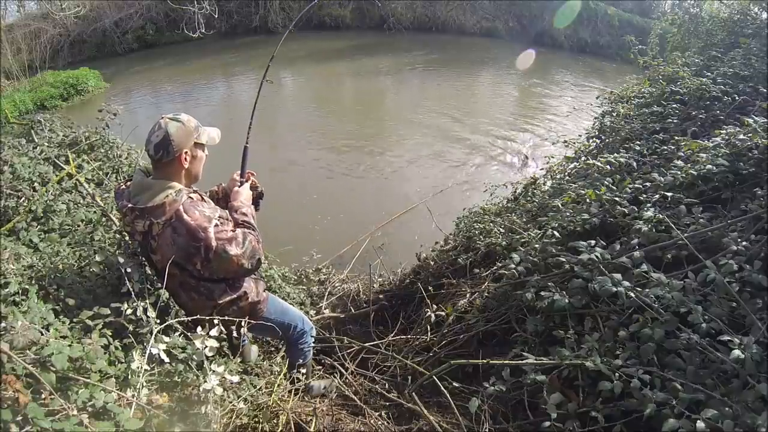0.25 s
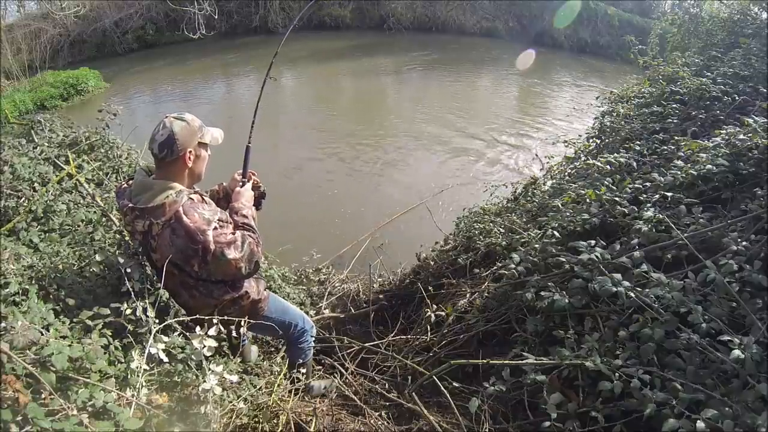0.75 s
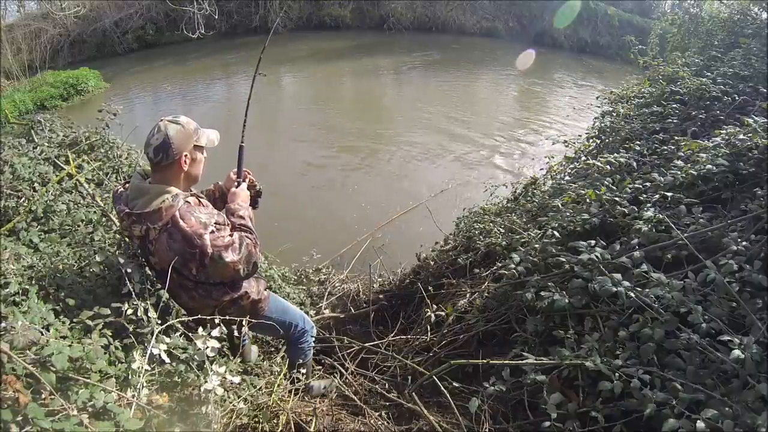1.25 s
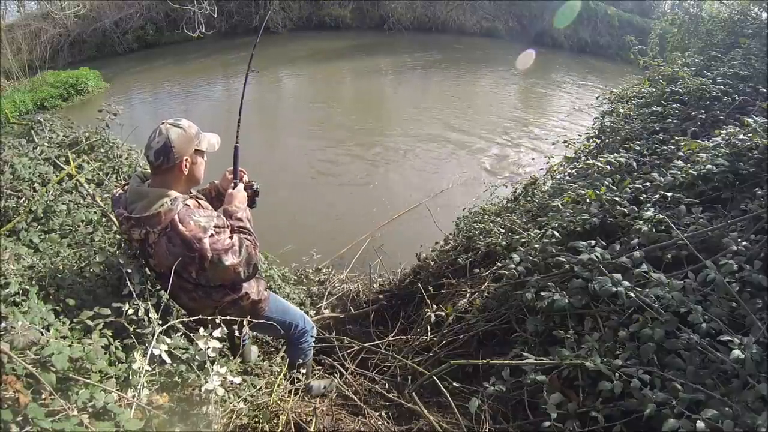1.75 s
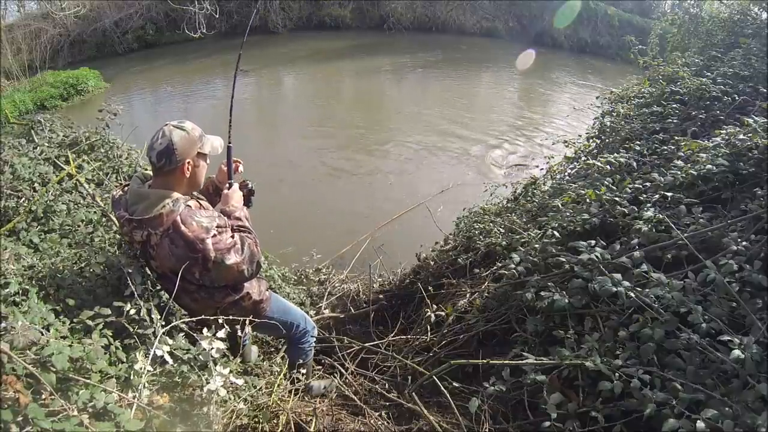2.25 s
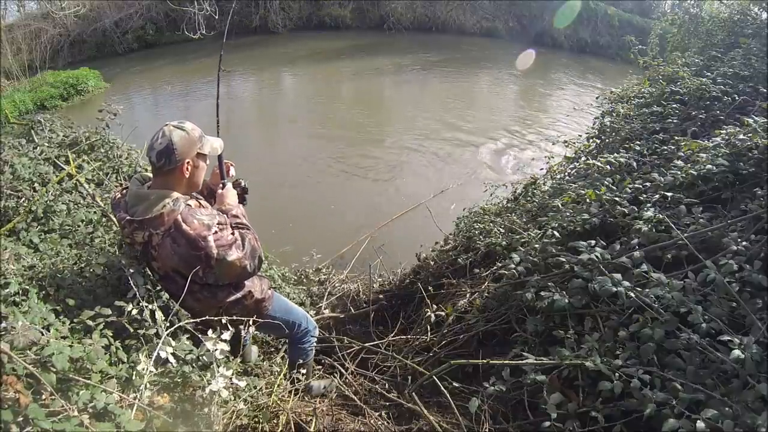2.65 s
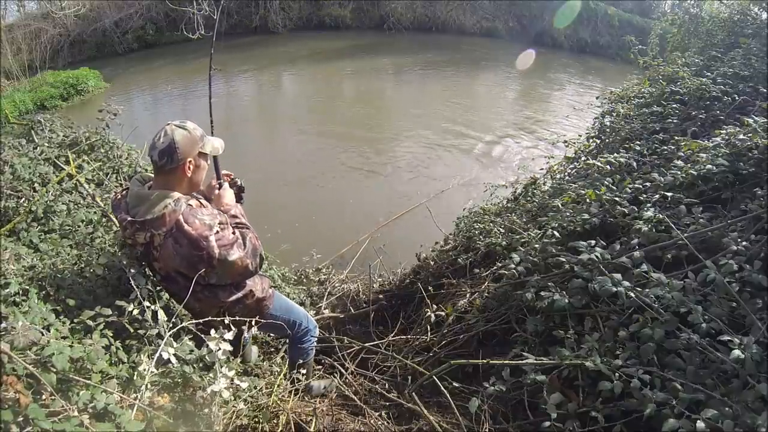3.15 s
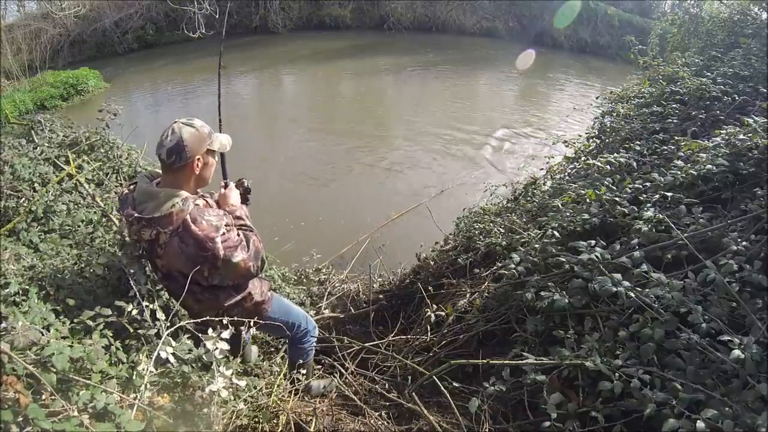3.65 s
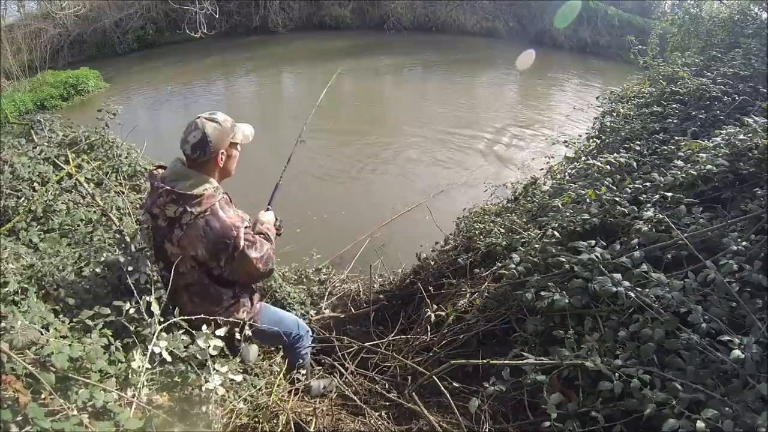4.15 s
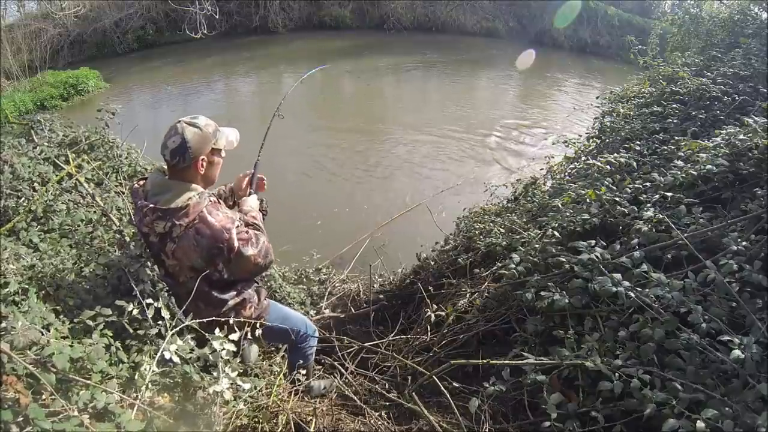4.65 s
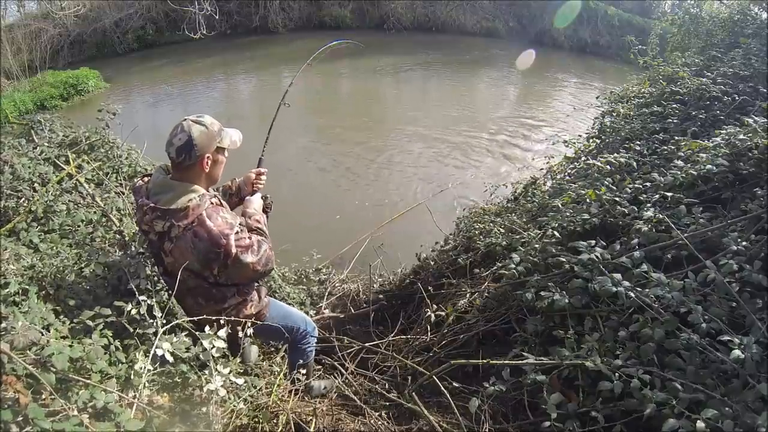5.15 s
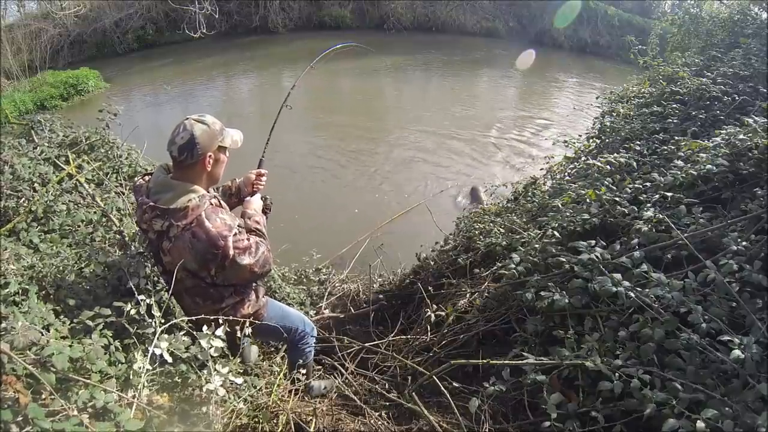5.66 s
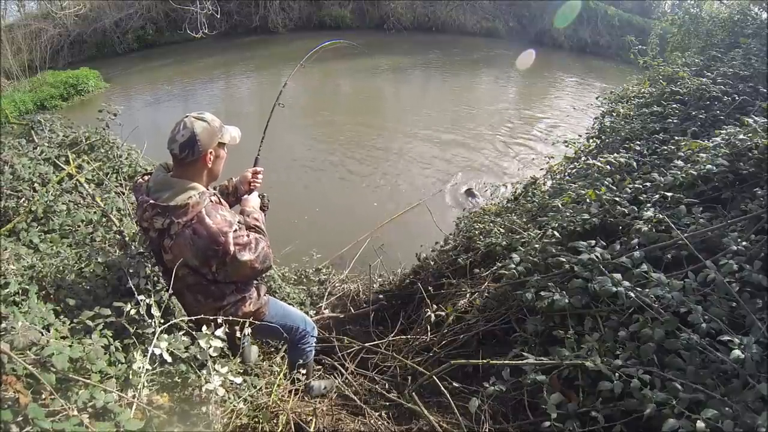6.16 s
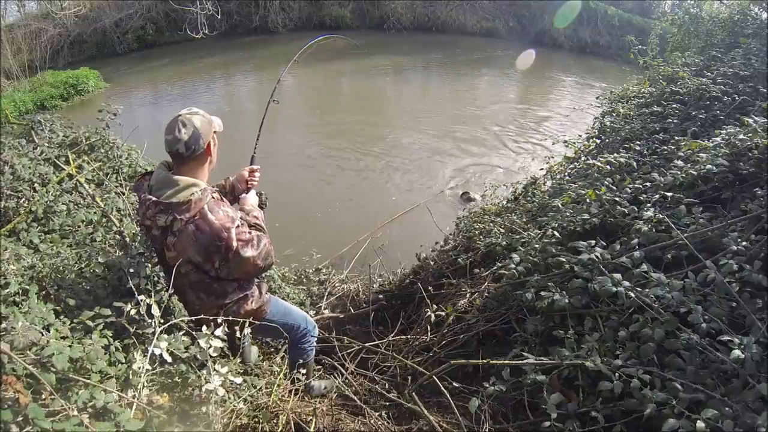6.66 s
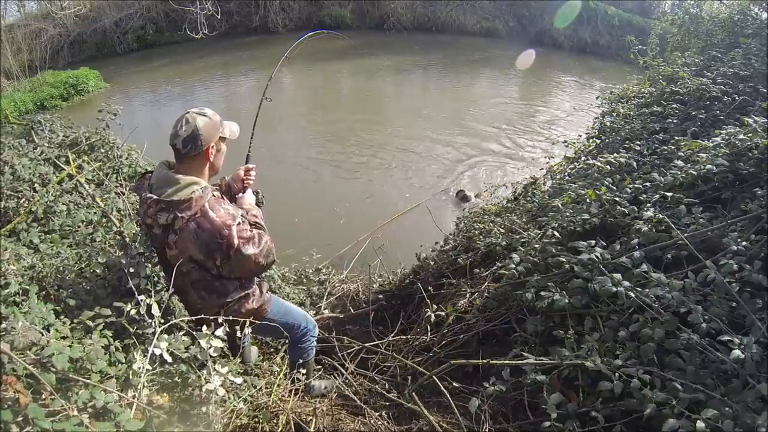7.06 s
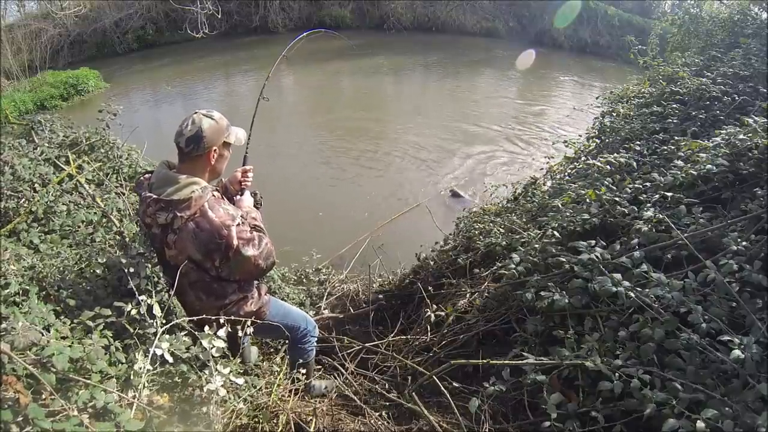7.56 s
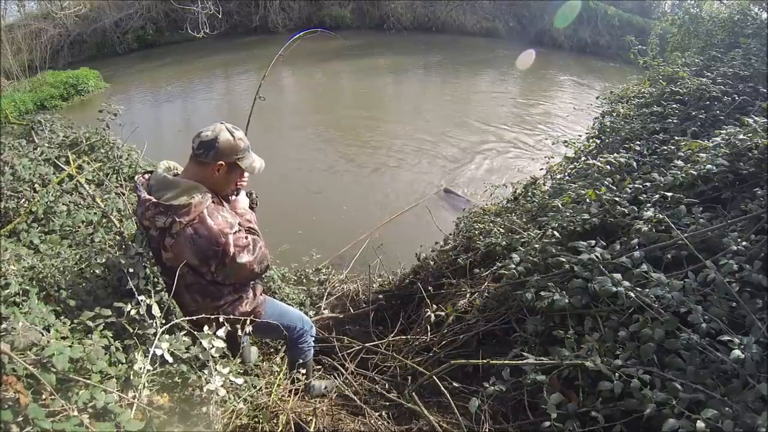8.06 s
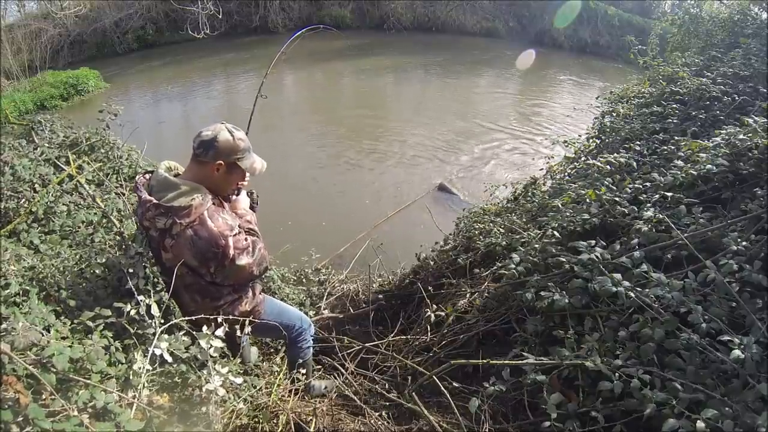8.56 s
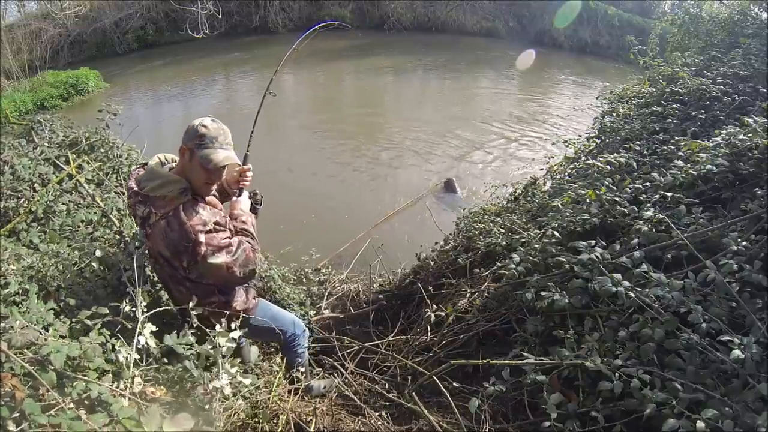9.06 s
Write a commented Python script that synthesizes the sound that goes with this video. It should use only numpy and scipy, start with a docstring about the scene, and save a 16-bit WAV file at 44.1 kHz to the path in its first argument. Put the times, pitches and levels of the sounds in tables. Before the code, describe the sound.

A hooked fish swirls, gulps and thuds at a muddy riverbank over distant engine rumble; a reel clicks once, dry stalks crack at the end.

```python
"""A hooked fish swirls, gulps and thuds at the surface; dry stalks crack, a reel clicks, an engine pulls away.
A small bird warbles faintly over distant traffic, a high hiss and a thin steady tone.
Engine, bird and thin tone are driven sines; bubbles, ticks, stems and reel are decaying tones; cracks are
short tone pulses. Traffic, hiss, fizz, spray and leaves are coloured noise or grains under level curves."""
import sys
import numpy as np
from scipy import signal
from scipy.fft import rfft, irfft, next_fast_len
from scipy.io import wavfile

SR = 44100
rng = np.random.default_rng(int(sys.argv[2]) if len(sys.argv) > 2 else 0)


def volts(x):
    """Linear amplitude factor 10**(x/20) for a level x in dB, scalar or array-like."""
    e = np.asarray(x, float) / 20
    return 10 ** e


def transcribe(u):
    """Save the signal u as a 16-bit wav file named by the first command-line argument.

    u: samples, shape (n,) or (channels, n), limited to [-1, 1]; the rate is SR.
    q: integer samples, one column per channel.
    """
    v = np.clip(np.atleast_2d(u).T, -1, 1)
    q = np.round(v * 32767).astype(np.int16)
    wavfile.write(sys.argv[1], SR, q)


N = 411012

# spectrum of churned water: f/Hz, relative density/dB
CHURN_TONE = [(180, -25), (300, 1), (380, -13), (451, -7), (595, -5.5), (653, -3.5), (1090, 4), (1420, -7),
              (1980, 0.5), (2860, -16), (7000, -32), (9100, -69), (15400, -120)]
# spectrum of fine spray: f/Hz, relative density/dB
SPRAY_TONE = [(1800, -30), (2500, -3), (3200, 0), (3900, -9), (5200, -12), (6200, -24), (9000, -26),
              (15000, -36)]
# spectrum of dry leaves: f/Hz, relative density/dB
RUSTLE_TONE = [(180, -39), (300, -10), (492, -10), (662, -8.5), (1240, -4), (1370, -12), (1930, -2.5),
               (2560, -12), (5120, -22), (5550, -24.5), (7230, -35.5), (8810, -26), (15400, -41)]
# large bubbles: t/s, start level/dB, start f/Hz, rise/(octaves/s)
BUBBLES = [(.755, -49, 1120, -1), (1.129, -50, 740, -4), (1.955, -55, 1250, 8), (2.028, -46, 908, -12),
           (2.072, -38.5, 813, 0.5), (2.073, -49, 1065, 9), (2.085, -53, 495, 3), (2.158, -51, 1700, 5),
           (2.19, -54, 1110, -6), (2.812, -48, 870, -1.5), (3.635, -48, 1000, 9), (3.657, -49, 950, 3),
           (4.305, -45, 2120, -5), (4.327, -44.5, 1210, 1), (4.38, -48, 2100, -1), (4.4, -43, 2000, 3),
           (5.418, -48, 860, -3), (5.471, -46, 1030, -1), (5.495, -45, 1026, 0), (5.577, -45, 848, 8.5),
           (5.705, -44.5, 670, 5), (5.88, -52, 1160, 2), (5.93, -46, 960, -1), (5.965, -42, 1113, 0.5),
           (6.07, -46.5, 767, 0), (6.815, -49, 518, -1), (6.864, -46, 1400, -9), (6.869, -44, 998, 1),
           (6.928, -49.5, 386, -4.5), (6.932, -48, 1050, 5), (7.01, -45, 974, 2), (7.232, -49, 760, 9),
           (7.727, -46, 1000, -1.5), (8.123, -45.5, 1160, 1)]


def rms_one(x):
    """Scale to rms 1."""
    return x / np.sqrt(np.mean(x ** 2) + 1e-20)


def in_time(rows):
    """Columns of a table as sample curves."""
    s, *columns = np.transpose(rows)
    return [np.interp(np.arange(N) / SR, s, c) for c in columns]


def fade(rows, edge_s):
    """1 inside the table's span, sloping to 0 outside."""
    first_s, last_s = rows[0][0], rows[-1][0]
    return np.interp(np.arange(N) / SR, [first_s - edge_s, first_s, last_s, last_s + edge_s], [0, 1, 1, 0])


def coloured(x, spectrum):
    """Shape a white signal to this spectrum, log-f interpolated; rms 1."""
    hz, db = np.transpose(spectrum)
    size = next_fast_len(N)
    log_hz = np.log(np.arange(1, size // 2 + 2) * SR / size)
    gain = volts(np.interp(log_hz, np.log(hz), db))
    return rms_one(irfft(rfft(x, size) * gain, size)[:N])


def drift(rate_hz):
    """Slow random wander of rms 1: twice low-passed noise, drawn every 40 samples."""
    r = np.exp(-80 * np.pi * rate_hz / SR)
    slow = signal.lfilter([1], [1, -2 * r, r * r], rng.standard_normal(N // 40 + 2002))[2000:]
    return np.interp(np.arange(N) / 40, np.arange(len(slow)), rms_one(slow))


def ring(clicks, hz, t60_s):
    """Two-pole resonance: a unit click starts a dying sine of height 1."""
    r, w = volts(-60 / (t60_s * SR)), 2 * np.pi * hz / SR
    return signal.lfilter([0, np.sin(w)], [1, -2 * r * np.cos(w), r * r], clicks + 1e-18)


def add(out, s, db, hz, t60_s, rise, attack_s):
    """Add one dying tone gliding by rise octaves/s."""
    start = round(s * SR)
    t = np.arange(min(round(1.2 * t60_s * SR), N - start)) / SR
    turns = np.cumsum(hz * 2 ** (rise * t)) / SR
    level = volts(db - 60 * t / t60_s) * np.minimum(t / attack_s, 1)
    out[start:start + len(t)] += level * np.sin(2 * np.pi * turns)


def bursts(times, db, t60_s):
    """Envelope that jumps at each time and dies away."""
    marks = np.zeros(N)
    marks[np.round(np.array(times) * SR).astype(int)] = volts(db)
    return signal.lfilter([1], [1, -volts(-60 / (t60_s * SR))], marks + 1e-18)


def grains(per_s, spread_db):
    """Random clicks of uneven size and either sign."""
    sizes = volts(spread_db * np.minimum(rng.exponential(1, N), 4)) * rng.choice([-1, 1], N)
    return sizes * (rng.random(N) < per_s / SR)


def hiss():
    """High noise with a quick level flutter."""
    # f/Hz, relative density/dB
    air_tone = [(1900, -37), (2500, -1.5), (3150, -1), (3450, -8.5), (4300, -13), (5300, -14), (6300, -19),
                (7600, -21), (8700, -17), (10300, -24.5), (11300, -21), (12300, -28.5), (14000, -23.5),
                (15200, -29)]
    return volts(-71.5 + 1.96 * drift(37)) * coloured(rng.standard_normal(N), air_tone)


def whine():
    """Thin high sine with slight phase wander."""
    level_db, hz = -99, 11300
    return volts(level_db) * np.sin(2 * np.pi * hz * np.arange(N) / SR + 0.72 * drift(8))


def traffic():
    """Rumble, tyre noise and exhaust drone: coloured noises, each gently lumpy."""
    # rumble swelling and fading: t/s, level/dB before wander
    roar = [(0, -57), (1.06, -58.5), (2.28, -57), (3.71, -56.5), (4.38, -52.5), (5.4, -52), (6.1, -50.5),
            (6.4, -54), (6.9, -55), (7.47, -54), (8.33, -54.5), (8.82, -55), (9.32, -59)]
    # spectra: f/Hz, relative density/dB
    rumble_tone = [(12, -40), (20, -3.5), (48, 5.5), (75, 1), (99, -2), (178, -19), (300, -25.5),
                   (390, -45), (660, -120)]
    road_tone = [(88, -44), (150, 0), (246, -6.5), (342, -3), (380, -5.5), (595, -3), (638, -3.5),
                 (677, -4.5), (963, 0), (1470, -8), (1880, -1.5), (2500, -15.5), (3250, -49), (5500, -120)]
    drone_tone = [(90, -33), (135, 4), (240, -1.5), (330, -5.5), (480, -29), (900, -100)]
    # exhaust drone: t/s, level/dB before wander
    drone_level = [(1, -75), (6, -61), (6.7, -80), (9.32, -87)]
    road_db, road_follows = -59.5, 0.6   # at mean rumble dB; share of its swell
    rumble_db, = in_time(roar)
    road_db = road_db + road_follows * (rumble_db - rumble_db.mean())
    drone_db, = in_time(drone_level)
    rumble = volts(rumble_db + 1.5 * drift(1.5)) * coloured(rng.standard_normal(N), rumble_tone)
    road = volts(road_db + 0.7 * drift(7.8)) * coloured(rng.standard_normal(N), road_tone)
    drone = volts(drone_db + 1.1 * drift(5.0)) * coloured(rng.standard_normal(N), drone_tone)
    return rumble + road + drone


def engine():
    """Four firing orders as sines, weighted by pipe and distance; the air makes them waver."""
    # speed, idling then pulling away: t/s, firing f/Hz before wander
    firing = [(0, 31), (1.9, 32), (2.8, 37), (4, 44), (5.2, 50), (6, 52.8), (7.06, 62.3), (8.2, 71.5),
              (9.32, 78)]
    # t/s, effort/dB
    effort = [(0, -67), (.8, -57), (1.1, -57), (1.9, -53.5), (2.3, -47), (3.2, -49), (3.9, -55.5),
              (4.3, -48), (4.7, -52.5), (5.1, -55), (5.5, -57.5), (6, -52), (7.1, -45), (7.5, -52),
              (9.32, -56)]
    # pipe and distance weighting of an order: f/Hz, gain/dB
    exhaust = [(55, -0.3), (63, -6.5), (75, -2.5), (88, -10), (98, 0), (107, -11), (116, -19), (130, -12.5),
               (145, -18.5), (200, -40)]
    order_loss_db = 1.4   # per order
    hz = in_time(firing)[0] * (1 + 0.0058 * drift(1.96))
    turns, effort_db = np.cumsum(hz) / SR, in_time(effort)[0]
    pipe_hz, pipe_db = np.transpose(exhaust)
    out = np.zeros(N)
    for k in range(1, 5):
        weight_db = np.interp(np.log(k * hz), np.log(pipe_hz), pipe_db) - order_loss_db * (k - 0.5)
        level = np.sqrt(2) * volts(effort_db + weight_db + 1.54 * drift(4.2))
        out += level * np.sin(2 * np.pi * k * turns)
    return out


def bird():
    """A far warble of gliding sines, broken and blurred by leaves."""
    # one list per note: t/s, f/Hz before wander, level/dB before blur
    notes = [
        [(2.34, 2700, -68), (2.36, 2460, -66), (2.4, 2430, -67), (2.42, 2520, -65), (2.46, 2550, -67)],
        [(3.575, 2710, -66), (3.6, 2500, -63), (3.64, 2350, -67)],
        [(3.865, 1800, -62), (3.89, 2320, -61), (3.905, 2360, -50), (3.925, 2370, -63), (3.95, 2950, -68)],
        [(4.06, 3000, -70), (4.115, 3250, -68), (4.15, 2300, -63)],
        [(4.25, 3120, -69), (4.285, 3040, -67)],
        [(4.335, 2200, -65), (4.365, 2380, -62)],
        [(8.05, 2600, -66), (8.1, 2400, -67)],
    ]
    out = np.zeros(N)
    blur = 0.8 + 0.45 * drift(120)
    for rows in notes:
        hz, db = in_time(rows)
        turns = np.cumsum(hz * (1 + 0.01025 * drift(41.6))) / SR
        out += volts(db + 2.0 * drift(25)) * blur * fade(rows, 0.015) * np.sin(2 * np.pi * turns)
    return out


def cracks():
    """A stalk's crack is a cycle or so of its body tone under a Gaussian."""
    # t/s, peak/dB, body f/Hz
    crack_rows = [(8.8294, -46, 2720), (8.979, -31.5, 1120), (9.053, -40, 1700), (9.061, -36, 1950),
                  (9.105, -46, 1500), (9.1197, -30.5, 670), (9.1639, -35, 2000), (9.1766, -32, 900),
                  (9.209, -32, 610), (9.2134, -36, 700), (9.2153, -33, 1500), (9.2254, -35, 620),
                  (9.234, -25.5, 970), (9.24, -40, 1600), (9.2568, -30, 1170), (9.2626, -24.5, 840),
                  (9.266, -25.5, 1950), (9.277, -34, 1930), (9.3009, -24, 865)]
    out, t = np.zeros(N), np.arange(-200, 200) / SR
    width_cycles = 0.98   # full width at 1/e
    for s, db, hz in crack_rows:
        at = round(s * SR)
        pulse = np.exp(-(2 * t * hz / width_cycles) ** 2) * np.cos(2 * np.pi * hz * t)
        out[at - 200:at + 200] += volts(db) * pulse
    return out


def stems():
    """Knocked hollow stems ring on a little, falling in pitch."""
    # t/s, start level/dB, start f/Hz, t60/s
    knocks = [(8.944, -26.5, 850, 0.022), (9.173, -25, 480, 0.027), (9.261, -29, 597, 0.035),
              (9.272, -30, 1950, .028)]
    out = np.zeros(N)
    for s, db, hz, t60_s in knocks:
        add(out, s, db, hz, t60_s, rise=-7.0, attack_s=0.003)
    return out


def leaves():
    """Dry leaves brush and puff as grains; each puff opens with a noise snap."""
    # brushing: t/s, level/dB before wander
    rustle = [(8.8, -72), (8.96, -62), (9.1, -59), (9.14, -68), (9.2, -58), (9.25, -58), (9.275, -51),
              (9.32, -55)]
    # puffs: t/s, start level/dB
    puffs = [(8.829, -60), (8.871, -60), (8.898, -60), (8.978, -50), (9.06, -50), (9.105, -58),
             (9.162, -52), (9.176, -47), (9.214, -48), (9.234, -49), (9.257, -53), (9.264, -40), (9.3, -49)]
    s, db = np.transpose(puffs)
    texture = coloured(grains(6000, spread_db=3.5), RUSTLE_TONE)
    brushing = volts(in_time(rustle)[0] + 2.5 * drift(30)) * fade(rustle, 0.12)
    snaps = coloured(rng.standard_normal(N), RUSTLE_TONE) * bursts(s, db + 6.0, t60_s=0.009)
    return snaps + texture * (brushing + bursts(s, db, t60_s=0.05))


def reel():
    """Quick contacts strike the reel's modes; the bushes scatter a short tail back."""
    # contacts: t/s, strike/dB
    contacts = [(1.544, -45), (1.5642, -22), (1.5655, -13.5), (1.5681, -24), (1.5694, -24), (1.5733, -35)]
    # modes: f/Hz, gain/dB, t60/s
    modes = [(974, -16, 0.011), (1650, -17, 0.016), (1950, -10, 0.011), (2335, -7.5, 0.011),
             (3110, -7.5, 0.013), (3670, -15, 0.01), (4240, -14, 0.0079), (4750, -21, 0.009),
             (5500, -23, 0.009), (6500, -27, .004), (8300, -25, 0.004), (10200, -26, 0.003),
             (12500, -27, .003)]
    # scattered tail: f/Hz, relative density/dB
    echo_tone = [(710, -60), (1200, -25), (2190, 1), (2600, -16), (2790, -5), (3490, -15), (5500, -16),
                 (6170, -31), (9320, -21), (15000, -33)]
    s, db = np.transpose(contacts)
    out = np.zeros(N)
    for k, (hz, mode_db, t60_s) in enumerate(modes):
        clicks = np.zeros(N)
        clicks[np.round(s * SR).astype(int)] = volts(db + mode_db + rng.normal(0, 1.5, len(s)))
        out += (-1) ** k * ring(clicks, hz, t60_s)
    # a small part radiates no bass
    out = signal.sosfilt(signal.butter(2, 600, "high", fs=SR, output="sos"), out)
    scatter = coloured(rng.standard_normal(N), echo_tone) * volts(3.0 * drift(70))
    return out + scatter * bursts([s[2] + 0.0028], -42.5, t60_s=0.17)


def ticks():
    """Drops and ticks ring briefly, each inside a short puff of spray."""
    # t/s, start level/dB, start f/Hz
    tick_rows = [(0.4095, -44, 2090), (0.432, -45, 1800), (0.7196, -41.5, 1970), (1.0972, -46.5, 1900),
                 (2.0273, -37, 1840), (2.035, -39, 1820), (2.1186, -41, 2010), (2.149, -49, 2950),
                 (2.7054, -34.5, 1840), (2.706, -41, 1240), (3.5468, -41.5, 1900), (3.68, -45, 1930),
                 (3.9779, -30, 2070), (4.289, -45, 3070), (4.4877, -41, 1890), (4.632, -45, 1900),
                 (5.393, -48, 2150), (5.474, -44, 2400), (5.4954, -40, 2450), (5.7226, -35, 2000),
                 (5.73, -37, 1980), (5.75, -39, 1850), (6.05, -40, 1950), (6.075, -40, 1900),
                 (6.095, -44, 1950), (6.18, -44, 2200), (6.3964, -43.5, 2150), (6.61, -53, 2500),
                 (6.8658, -45, 1910), (6.9306, -41.5, 1840), (7.2325, -41, 1900)]
    out = np.zeros(N)
    for s, db, hz in tick_rows:
        add(out, s, db, hz, t60_s=0.017, rise=0.1, attack_s=0.00096)
    s, db, hz = np.transpose(tick_rows)
    return out + coloured(rng.standard_normal(N), CHURN_TONE) * bursts(s, db - 18.5, t60_s=0.045)


def plips(strength):
    """Small drops fall at random, thicker and louder with the churn, gliding up."""
    count, mean_db, follows = 200, -55.5, 0.6   # base level at mean churn; share of its dB swing
    t60_cycles = 34
    out = np.zeros(N)
    share = np.cumsum(strength) / np.sum(strength)
    for when, size, pitch, rise in rng.random((count, 4)):
        at = min(np.searchsorted(share, when), N - 1)
        hz = 700 * 3.6 ** pitch
        swing_db = 20 * np.log10(strength[at] / strength.mean())
        db = mean_db + follows * swing_db - 4.0 * np.log(size + 0.05)
        add(out, at / SR, db, hz, t60_cycles / hz, 25 * rise, attack_s=0.0015)
    return out


def droplets():
    """Fine spray droplets are tiny high pings, gliding up."""
    # t/s, start level/dB, start f/Hz
    droplet_rows = [(1.9814, -59, 4850), (2.0009, -64, 5240), (2.0358, -59, 4210), (2.0654, -67, 4690),
                    (2.0712, -62, 4220), (2.0994, -66, 5200), (2.1181, -59, 4290), (2.1424, -64, 5310),
                    (2.1924, -63, 4990), (2.2114, -68, 5280)]
    out = np.zeros(N)
    for s, db, hz in droplet_rows:
        add(out, s, db, hz, t60_s=0.0094, rise=5.0, attack_s=0.001)
    return out


def flicks():
    """Flicks of bright spray: noise bursts dying fast."""
    # t/s, start level/dB
    flick_rows = [(1.458, -66), (2.035, -65), (2.07, -65), (2.118, -66), (4.047, -68), (4.07, -68),
                  (4.45, -65), (5.875, -65), (6.742, -57), (6.837, -65), (6.88, -63), (7.28, -61),
                  (7.35, -63)]
    s, db = np.transpose(flick_rows)
    return bursts(s, db, t60_s=0.035) * coloured(rng.standard_normal(N), SPRAY_TONE)


def churning():
    """Gains of churn and spray: swirls rise, hold lumpily and fall; large bubbles add fizz to the churn."""
    # fish swirls: t/s, length/s, churn/dB, spray/dB, both before lumpiness
    swirl_rows = [(0.263, 0.72, -71.5, -87), (2.007, 0.18, -68, -74), (3.62, 0.041, -66, -82),
                  (3.876, 0.33, -65, -71), (4.272, 0.22, -67, -70), (5.405, 0.14, -61.5, -75),
                  (5.647, 0.14, -60, -74), (5.85, 0.24, -63.5, -74), (6.6, 0.018, -67, -83),
                  (6.77, 0.19, -66.5, -79), (7.23, 0.054, -66, -78)]
    rise_s, fall_s, lumpy_db = 0.054, 0.11, 2
    t, swirls = np.arange(N) / SR, np.zeros((2, N))
    for s, length_s, churn_db, spray_db in swirl_rows:
        shape = np.interp(t, [s - rise_s, s, s + length_s, s + length_s + fall_s], [0, 1, 1, 0])
        swirls += volts([[churn_db], [spray_db]]) * shape
    churn, spray = swirls * volts(lumpy_db * drift(11))
    s, db, hz, rise = np.transpose(BUBBLES)
    return churn + bursts(s, db - 18.5, t60_s=0.19), spray


def bubble_swarm():
    """Random clicks ring small bubbles at 30 pitches; rms 1."""
    clicks = grains(1500 * volts(1.5 * drift(15)), spread_db=3.2)
    pitches_hz, dealt = np.geomspace(350, 4200, 30), rng.integers(0, 30, N)
    swarm = np.zeros(N)
    for k, hz in enumerate(pitches_hz):
        # two resonances in series give a soft start
        bubbles = ring(ring(clicks * (dealt == k), hz, 23.6 / hz), hz, 7.3 / hz)
        swarm += rms_one(bubbles) * np.sqrt(hz)
    return rms_one(swarm)


def water():
    """Bubble swarm over fizz trickles throughout and swells with the swirls, adding plips and spray."""
    trickle_db = -68
    texture = coloured(bubble_swarm() + 0.7 * rng.standard_normal(N), CHURN_TONE)
    churn, spray = churning()
    strength = volts(trickle_db) + churn
    spray_texture = coloured(grains(2500, spread_db=4.5), SPRAY_TONE)
    return texture * strength + plips(strength) + spray * spray_texture


def large_bubbles():
    """Large bubbles ring as gliding tones whose decay scales with period."""
    out, t60_cycles = np.zeros(N), 66
    for s, db, hz, rise in BUBBLES:
        add(out, s, db, hz, t60_cycles / hz, rise, attack_s=0.0024)
    return out


def gulps():
    """Pockets of air keep sounding while they slide up in pitch."""
    # t/s, length/s, level/dB before waver, start f/Hz, f/Hz at that length
    gulp_rows = [(2.05, .014, -54, 1600, 2050), (2.095, .02, -56, 1850, 2000),
                 (2.13, .018, -56, 1500, 2000), (5.689, .005, -36, 1850, 2150),
                 (5.998, .006, -43, 1750, 2100), (2.374, .012, -55, 1250, 1800), (2.81, .04, -57, 640, 900),
                 (5.745, .04, -49.5, 780, 980), (6.748, .03, -51, 700, 900),
                 (6.757, 0.0102, -52, 860, 1150), (6.799, .036, -52, 400, 1100),
                 (6.845, .02, -57, 1050, 1200), (6.855, .03, -52, 800, 1000)]
    edge_s = 0.004   # rise; the fall takes twice this
    out, waver = np.zeros(N), volts(3.0 * drift(90))
    for s, length_s, db, start_hz, end_hz in gulp_rows:
        t = np.arange(round((length_s + 2 * edge_s) * SR)) / SR
        turns = np.cumsum(start_hz * (end_hz / start_hz) ** (t / length_s)) / SR
        edges = np.clip(np.minimum(t, (t[-1] - t) / 2) / edge_s, 0, 1)
        at = round(s * SR)
        out[at:at + len(t)] += volts(db) * edges * waver[at:at + len(t)] * np.sin(2 * np.pi * turns)
    return out


def thuds():
    """Low swells thud as the tail beats, sinking slightly in pitch."""
    # t/s, start level/dB, start f/Hz
    thud_rows = [(4.287, -28, 47), (5.629, -29, 37.3), (5.637, -34, 58), (5.969, -30, 77),
                 (5.991, -26, 42.8), (6.039, -25.5, 46), (8.179, -34, 40.6)]
    out = np.zeros(N)
    for s, db, hz in thud_rows:
        add(out, s, db, hz, t60_s=0.12, rise=-0.3, attack_s=0.021)
    return out


def scene():
    """All sources at one microphone."""
    background = hiss() + whine() + traffic() + engine() + bird()
    bank = cracks() + stems() + leaves() + reel()
    fish = ticks() + droplets() + flicks() + water() + large_bubbles() + gulps() + thuds()
    return (background + bank + fish)[None]


def band_limit(x):
    """A steep low-pass at the top of the band."""
    return signal.sosfilt(signal.butter(12, 15590, fs=SR, output="sos"), x)


def record(dry):
    """Low-pass: 60 dB down from 16 kHz."""
    cut = signal.sosfilt(signal.cheby2(12, 60, 16000, fs=SR, output="sos"), dry)
    return band_limit(cut)


dry = scene()
out = record(dry)
transcribe(out)
```